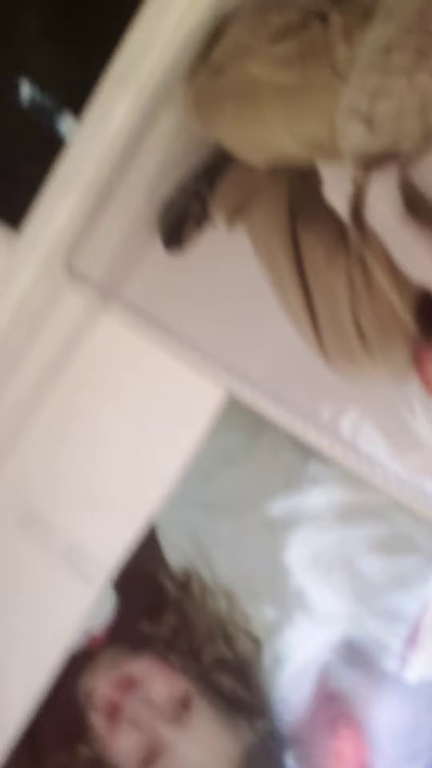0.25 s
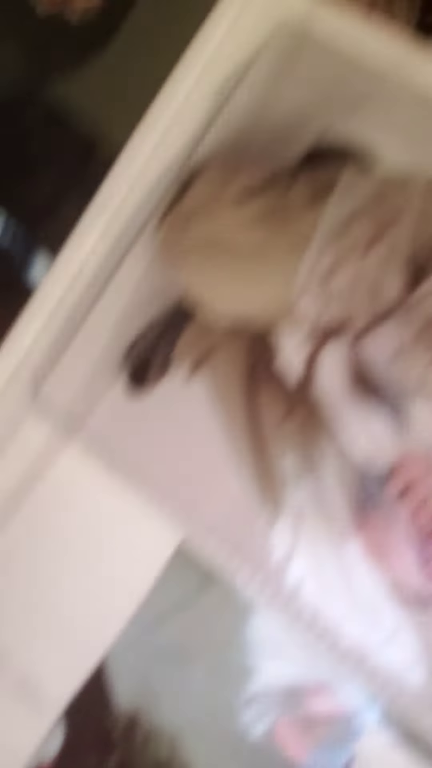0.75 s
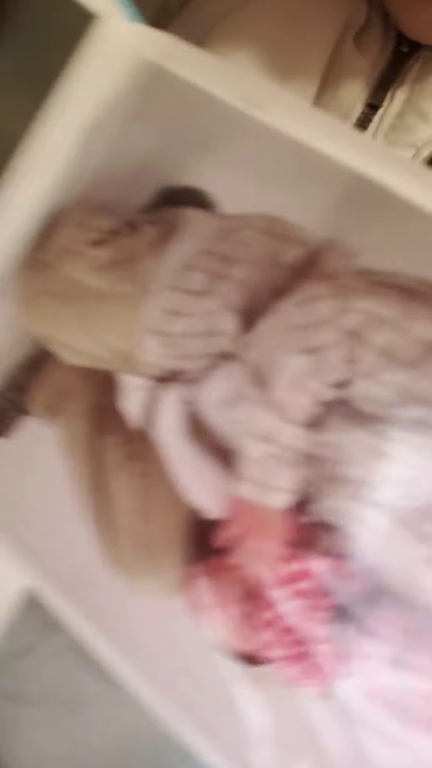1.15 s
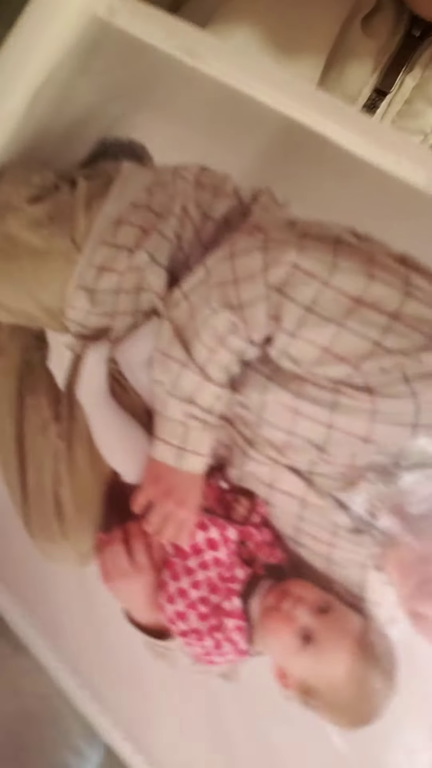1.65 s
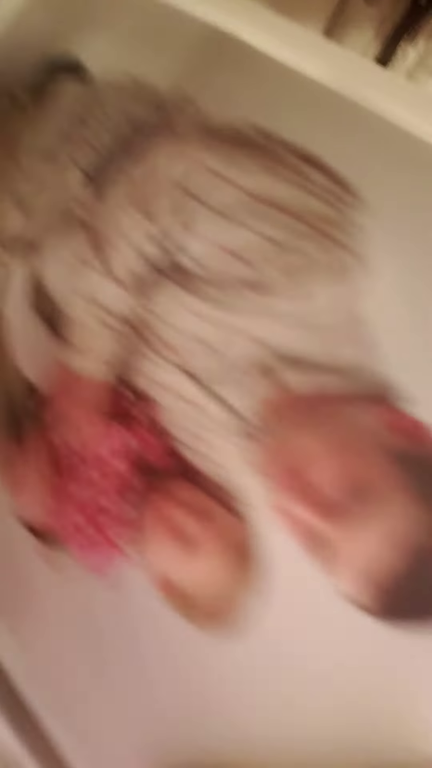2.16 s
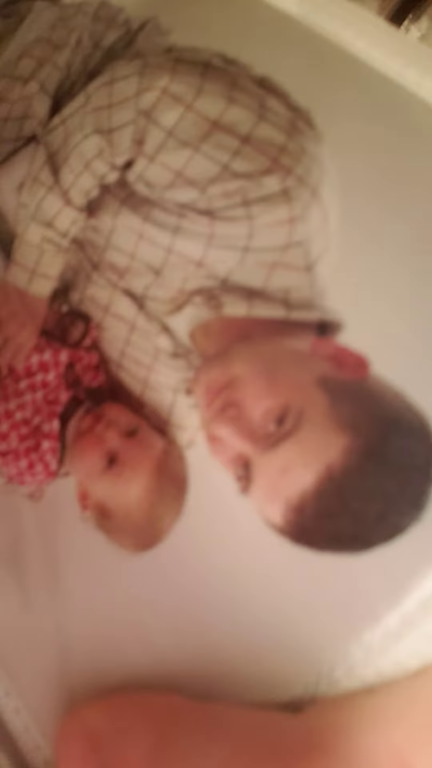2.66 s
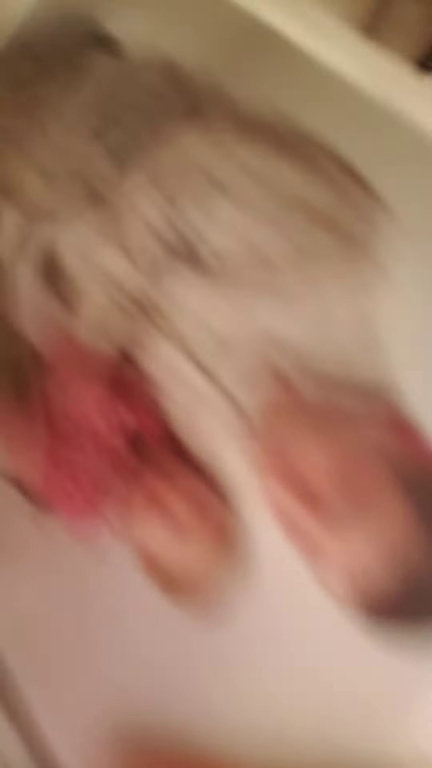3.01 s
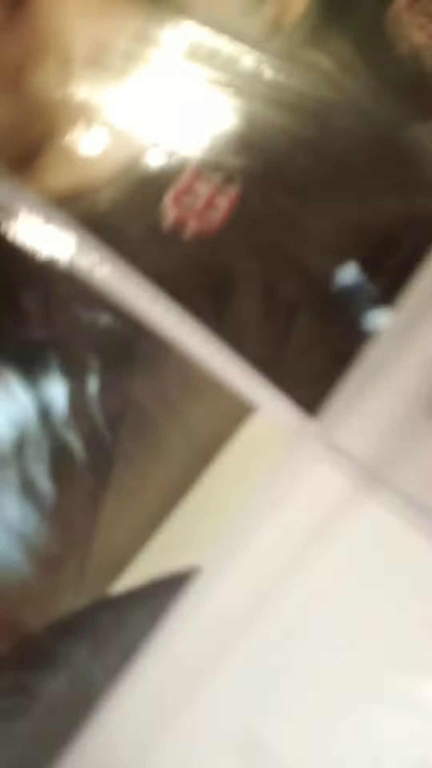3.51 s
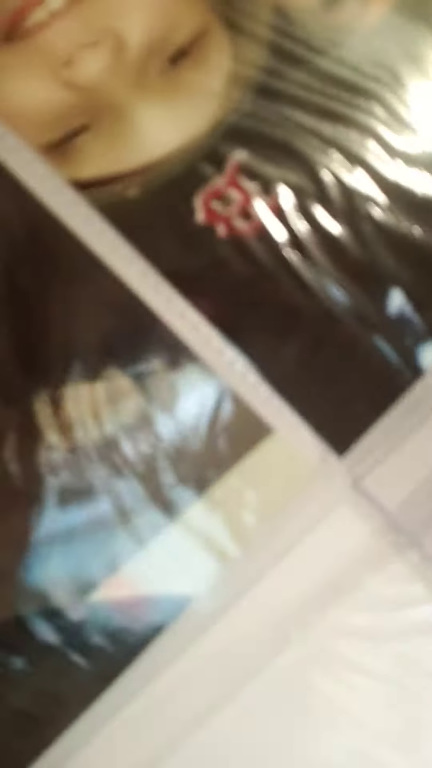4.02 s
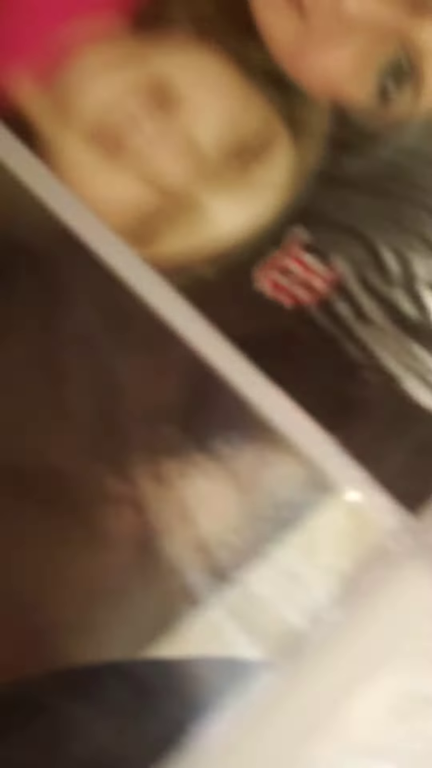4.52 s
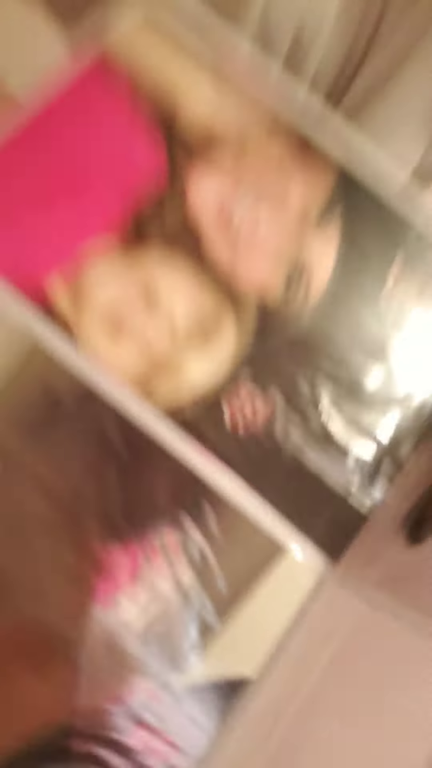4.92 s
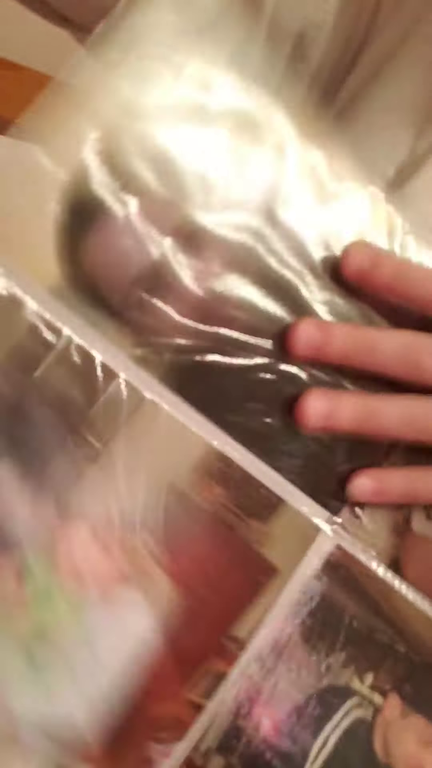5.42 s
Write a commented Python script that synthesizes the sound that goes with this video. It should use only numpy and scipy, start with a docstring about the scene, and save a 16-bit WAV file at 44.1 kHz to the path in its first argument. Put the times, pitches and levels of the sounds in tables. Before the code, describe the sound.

A photo album is handled in a quiet room. Soft film-on-film sliding and dull bumps come first, thinning to almost nothing but a few isolated ticks. Then the plastic page sweeps over, crinkling brightly, with bursts of sharp snaps, short scuffs and soft heavy bumps to the end. Close stereo pickup, stronger on the left, with faint air noise and little reverberation.

```python
"""Turning the pages of a photo album

Plastic sleeves are handled close to the left microphone, in a quiet room with faint air noise and hum.
Film slides over film: hiss and tiny stick-slips shake its resonances. Creases snap through as clicks that
ring briefly, and sleeves scuff past each other in short, gliding bands of noise. Heavy pages bump softly
and the stiff cover is knocked: both are pushes and rubs, the bumps mostly low and broad, the cover
ringing in narrower modes."""
import sys
import numpy as np
from scipy import signal
from scipy.fft import rfft, irfft, next_fast_len
from scipy.io import wavfile

SR = 44100
rng = np.random.default_rng(int(sys.argv[2]) if len(sys.argv) > 2 else 0)


def materialize(psi):
    """Save the field psi as 16-bit PCM at rate SR to the path in sys.argv[1].

    A 1-D psi becomes a single channel; in a 2-D psi each row is a channel.
    """
    bounded = np.clip(np.atleast_2d(psi).T, -1, 1)
    quanta = np.round(bounded * 32767).astype(np.int16)
    wavfile.write(sys.argv[1], SR, quanta)


N = 250078   # length in samples
TIME = np.arange(N) / SR   # s
PADDED = next_fast_len(N, real=True)   # a length that suits the Fourier transform
HZ = np.maximum(np.arange(PADDED // 2 + 1) * SR / PADDED, 1)
CUTOFF_HZ = 15800   # top of the sound
USUAL_PAN_DB = 15.5   # usual lean of a crease to the left


def from_db(db):
    """Decibels to gain."""
    return 10 ** (np.asarray(db) / 20)


def rms_one(x):
    """Scale to rms 1."""
    return x / np.sqrt(np.mean(x ** 2) + 1e-20)


def unit_energy(x):
    """Scale each channel to the energy of rms 1 held for a millisecond."""
    energy = np.sum(x ** 2, axis=-1, keepdims=True)
    return x / np.sqrt(energy / (SR / 1000) + 1e-20)


def leaning(pan_db):
    """Left and right gains that share one unit of power; positive leans to the left."""
    return 1 / np.sqrt(1 + from_db([[-pan_db], [pan_db]]) ** 2)


def at_hz(points, hz, axis=1):
    """Read one column of a table along log frequency."""
    table = np.array(points)
    return np.interp(np.log(hz), np.log(table[:, 0]), table[:, axis])


def drift(rate):
    """A random wander: straight lines between normal random values, `rate` of them per second."""
    knots = rng.standard_normal(4096)
    return np.interp(TIME * rate, np.arange(len(knots)), knots)


def resonate(x, hz, octaves):
    """A resonance as a band filter, reaching `octaves` to either side of its centre."""
    edges = np.clip([hz / 2 ** octaves, hz * 2 ** octaves], [15, 30], [.4 * SR, .47 * SR])
    return signal.sosfilt(signal.butter(2, edges, "band", fs=SR, output="sos"), x)


def add(track, s, sound):
    """Mix a sound in at a time."""
    start = int(np.clip(round(s * SR), 0, N - 1))
    track[..., start:start + sound.shape[-1]] += sound[..., :N - start]


def pair(spectra, lag_s):
    """Two unrelated spectra become left and right: partly alike, most so at low pitch, the shared part late."""
    # how much the two sides share: f/Hz, likeness/0-1
    likeness = [(60, .55), (130, .7), (300, .85), (600, .65), (1100, .33), (3000, .22), (15000, .2)]
    alike = np.clip(at_hz(likeness, HZ), 0, 1)
    late = spectra[0] * np.exp(-2j * np.pi * HZ * lag_s)
    return np.array([spectra[0], alike * late + np.sqrt(1 - alike ** 2) * spectra[1]])


def ports(x, lag_s):
    """Each microphone port colours the sound; the right one lies in shadow and hears the shared part late."""
    # colour of the port facing the album and of the shadowed one: f/Hz, left level/dB, right level/dB
    port_colours = [(100, 0, -7), (350, 0, -4.5), (900, 0, -10), (2000, 0, -14.5), (4000, 0, -14),
                    (5200, -.5, -12.5), (6500, -1, -14.5), (7300, 3.5, -16), (7800, -1, -15.5),
                    (8350, -9, -22), (9500, -7, -23), (11200, -13, -12.5), (12300, -10, -7),
                    (13500, -10, -9), (15000, -10, -8)]
    gains = from_db([at_hz(port_colours, HZ, axis=1), at_hz(port_colours, HZ, axis=2)])
    return irfft(pair(rfft(x, PADDED), lag_s) * gains, PADDED)[:, :N]


def room_tone():
    """Still air is shaped noise; the low hum is a sine that wavers in phase and level."""
    # colour of the still air: f/Hz, level per Hz/dB
    air_colour = [(15, -52), (30, 2.5), (50, 1), (90, 2), (130, 0.5), (170, -12), (300, -17), (600, -32),
                  (1500, -47), (5000, -21), (15000, -26.5)]
    air_db, hum_hz, hum_db = -65, 102, -76   # levels ahead of the ports
    noise = rfft(rng.standard_normal((2, PADDED)))
    air = irfft(noise * from_db(at_hz(air_colour, HZ)), PADDED)[:, :N]
    hum = np.sqrt(2) * np.sin(2 * np.pi * hum_hz * TIME + .5 * drift(4.0))
    hum = hum * from_db(hum_db + 2 * drift(7.1))
    return ports(from_db(air_db) * rms_one(air) + hum * [[1], [0]], lag_s=0.00012)


def reflections(x, t60, wet_db):
    """The furnished room answers the left channel with a short, dull tail of fading noise."""
    t = TIME[:16384]
    tail = rng.standard_normal((2, len(t))) * from_db(-60 * t / t60) * (t > .004)
    tail = signal.sosfilt(signal.butter(1, 5000, fs=SR, output="sos"), tail)
    tail = rms_one(tail) / np.sqrt(len(t))
    return from_db(wet_db) * signal.fftconvolve(x[:1], tail, axes=1)[:, :N]


def thud(hz, octaves, t60, rise_s, push):
    """A soft contact, part one push and part a rub that swells and dies away, sounds one resonance."""
    t, push = TIME[:16384], np.clip(push, 0, 1)   # push: share of the power, 0-1
    swell = (1 - np.exp(-t / rise_s)) * from_db(-60 * t / t60)
    force = np.sqrt(1 - push) * rng.standard_normal((2, len(t))) * swell / np.linalg.norm(swell)
    add(force[0], rise_s / 2, np.sqrt([push]))
    return rms_one(resonate(force, hz, octaves)) * np.sqrt(np.mean(swell ** 2))


def bumping_pages():
    """The limp, heavy pages bump against hand and album: each thud sounds one resonance, most low and broad."""
    # bumps: t/s, level ahead of the ports/dB, centre f/Hz, spread to either side/octaves,
    # time for the rub to fade by 60 dB/s
    bumps = [(0.331, -42.5, 238, 0.93, 0.17), (0.443, -43, 450, 1, 0.17), (1.131, -47.5, 203, 2.26, 0.47),
             (1.137, -44, 140, 1.2, 0.16), (1.19, -52.5, 920, 0.41, 0.28), (1.217, -53.5, 323, 0.46, 0.5),
             (1.409, -64, 328, 0.51, 1), (1.474, -46.5, 642, 0.76, 0.16), (1.499, -46, 200, 1, 0.21),
             (1.638, -48, 150, 1.73, 0.24), (1.77, -67, 60, 0.71, 0.66), (3.554, -48.5, 132.5, 0.4, 0.25),
             (3.82, -46, 153, 0.39, 0.22), (4.546, -37, 140, 0.89, 0.054), (4.808, -30.5, 104, 0.47, 0.048),
             (4.868, -28, 103.5, 1.13, 0.053), (4.888, -36, 74.6, 0.64, 0.068),
             (5.079, -36.5, 135.2, 0.5, 0.075), (5.114, -32.5, 79.4, 0.57, 0.071),
             (5.143, -35, 74.6, 0.49, 0.056), (5.183, -30, 82, 0.61, 0.097), (5.4, -35.5, 308, 0.11, 0.11),
             (5.402, -41, 750, 1, 0.21), (5.433, -37, 75, 1.5, 0.077)]
    push_s = 0.098   # bumps much shorter than this are one push, longer ones mostly rubbing
    out = np.zeros((2, N))
    for s, db, hz, spread, t60 in bumps:
        push = np.exp(-(t60 / push_s) ** 2)
        add(out, s, from_db(db) * thud(hz, spread, t60, rise_s=0.0107, push=push))
    return out


def knocking_cover():
    """The stiff cover is knocked and rings with several modes at once."""
    # knocks: t/s, level to which each mode's own level is added/dB
    knocks = [(.439, -36.5), (.453, -47.5), (5.408, -48)]
    # modes of the cover: f/Hz, width to either side/octaves, level/dB, time to fade by 60 dB/s
    modes = [(424, 0.22, -9.5, 0.27), (640, 0.086, -4, 0.17), (1200, 0.29, -3, 0.16),
             (2010, 0.053, 4.5, 0.15), (2886, 0.09, 17, 0.039), (3900, 0.36, 3, 0.11)]
    out = np.zeros((2, N))
    for s, db in knocks:
        for hz, width, mode_db, t60 in modes:
            add(out, s, from_db(db + mode_db) * thud(hz, width, t60, rise_s=0.00668, push=0.084))
    return out


def micro_slips(per_s, size_db):
    """Tiny stick-slip clicks in clumps, of very uneven size; rms 1."""
    born = rng.random(N) < per_s * from_db(5 * drift(70)) / SR
    sizes = from_db(size_db * np.minimum(rng.exponential(1, N), 3.5))
    clicks = born * sizes * rng.choice([-1, 1], (1, N))
    shiver = rng.standard_normal((2, 64)) * np.exp(-np.arange(64) / 14)
    # all pitches equally strong, but each click smeared over about a millisecond
    flat = irfft(np.exp(1j * np.angle(rfft(shiver))))
    return rms_one(signal.fftconvolve(clicks, flat, axes=1)[:, :N])


def grainy_noise(grain, per_s):
    """Smooth friction hiss mixed with micro-slips; `grain` is the slips' share of the power, 0-1."""
    hiss = rng.standard_normal((2, N))
    return np.sqrt(1 - grain) * hiss + np.sqrt(grain) * micro_slips(per_s, size_db=2.0)


def scuffing(grit=0.14, flutter_db=-1.3, taper=0.53, count=5):
    """A sleeve breaks loose and skids; its resonance glides as the free length of film changes."""
    # scuffs of film on film, the narrow ones almost singing: t/s, length/s, level before flutter and fades/dB,
    # centre f/Hz, spread to either side/octaves, glide/octaves
    scuffs = [(0.0, 0.64, -52.5, 3130, 0.11, -0.04), (0.0, 0.36, -59, 1990, 0.05, -0.017),
              (0.632, 0.12, -48, 3120, 0.26, -0.056), (0.668, 0.029, -44.5, 5770, 0.49, 0.076),
              (0.886, 0.019, -44, 3200, 0.18, -0.069), (0.934, 0.088, -46.5, 4600, 0.053, 0.16),
              (0.961, 0.07, -45, 3430, 0.1, 0.034), (0.999, 0.046, -46, 2320, 1.34, 0),
              (1.073, 0.043, -50, 1710, 0.21, -0.092), (1.022, .3, -57.5, 11800, 0.3, 0.04),
              (1.221, .25, -56.5, 3520, 0.12, -0.026), (1.492, 0.053, -59, 2540, 0.034, -0.019),
              (1.857, .3, -61, 7700, .17, 0.071), (2.874, 0.18, -66, 6650, 0.27, 0.4),
              (2.881, 0.17, -53.5, 3400, 0.59, -0.0052), (3.192, 0.26, -49.5, 756, 0.27, 0.25),
              (3.197, 0.11, -33, 4360, 0.69, 0.29), (3.281, 0.114, -36, 6040, 0.71, 0.22),
              (3.429, 0.33, -43, 3900, 0.26, 0.084), (4.145, 0.19, -49.5, 4170, 0.16, -0.034),
              (4.221, 0.024, -43.5, 1740, 0.18, 0.1), (3.786, 0.018, -26, 5160, 0.88, 0.000094),
              (3.777, 0.072, -35, 13260, 0.28, 0), (3.813, 0.064, -34, 4150, 0.57, -0.24),
              (4.311, 0.063, -39, 2570, 0.16, -0.079), (4.507, 0.023, -33.5, 2860, 0.41, -0.34),
              (4.496, 0.02, -32.5, 4570, 1.07, 0), (4.545, 0.0082, -27.5, 4470, 1.1, 0),
              (4.608, 0.027, -34, 5500, 0.81, 0), (4.971, 0.04, -32.5, 7900, 0.35, 0),
              (5.01, 0.09, -45, 3450, 0.089, -0.51), (5.213, 0.076, -35.5, 3050, 0.31, 0.13),
              (5.272, 0.032, -34, 6860, 0.62, -0.09), (5.378, 0.042, -33.5, 1685, 0.36, -0.027),
              (5.385, 0.034, -26.5, 4760, 0.33, -0.1), (5.437, 0.034, -28.5, 8050, 0.24, 0),
              (5.439, 0.022, -32.5, 2800, 0.63, 0), (5.476, 0.027, -28.5, 8120, 0.28, -0.026),
              (5.519, 0.036, -38, 7950, 0.3, -0.13), (5.596, 0.092, -34, 6050, 0.14, -0.076),
              (5.6, 0.083, -30.5, 10140, 0.14, -0.04)]
    out, longest = np.zeros((2, N)), 20000   # samples
    drive = grainy_noise(grit, per_s=1200)
    starts = rng.integers(0, N - longest, len(scuffs))   # each scuff takes its own piece of noise
    stages = np.linspace(-.5, .5, count)
    for (s, length, db, hz, spread, glide), start in zip(scuffs, starts):
        size = int(np.clip(length * SR, 64, longest))
        piece = drive[:, start:start + size]
        progress = np.linspace(-.5, .5, size)
        skid = np.zeros((2, size))
        for at in stages:   # the glide cross-fades between fixed resonances
            share = np.interp(progress, stages, stages == at)
            skid += resonate(piece, hz * 2 ** (glide * at), spread) * share
        add(out, s, rms_one(skid) * signal.windows.tukey(size, taper) * from_db(db))
    return out * from_db(flutter_db * drift(110))


def rubbing():
    """Sleeve rubs over sleeve: each rub swells, holds and fades; the loudest sets colour and place."""
    # rubs, first smoothing the page, from 3 s lifting and sweeping it over, from 4.077 s buckling and settling:
    # full speed at t/s, swell/s, hold/s, fade/s (20 dB per swell or fade time), level before judder/dB,
    # treble setting/dB, page body setting/dB, crinkle share/0-1, extra level at the right port/dB
    rubs = [(0.0, 0.1, 0.024, 0.25, -45.5, 3, -12.5, 0.45, -2),
            (0.202, 0.35, 0.093, 0.4, -45, 5.5, -9.5, 0.34, -1.5),
            (0.38, 0.25, 0.07, 0.18, -43, -3, -12, 0.1, 4.5),
            (0.682, 0.21, 0.072, 0.32, -45, -4, -13.5, 0.5, -1),
            (0.885, 0.17, 0.012, 0.0086, -46, 6, -24, 0.7, -5),
            (0.975, 0.16, 0.062, 0.037, -41, -2, -16.5, 0.27, 0.5),
            (1.058, 0.17, 0.14, 0.38, -48.5, 3.5, -8.5, 0.2, 6),
            (1.507, 0.1, 0.034, 0.065, -49, -4.5, -10, 0.28, 6.5),
            (1.633, 0.08, 0.017, 0.13, -47, -3, -6, 0, 6),
            (1.894, 0.42, 0.36, 0.22, -54, -0.5, -10.5, 0.07, -5.5),
            (2.795, 0.24, 0.037, 0.44, -67.5, -15, -6, 0, 3),
            (3, 0.099, 0.27, 0.081, -46, 6.5, -15.5, 0, -2),
            (3.211, 0.24, 0.15, 0.3, -36.5, 8, -10.5, 0.55, 1.5),
            (3.418, 0.5, 0.25, 0.81, -42, 0.5, -1.5, 0.6, -1.5),
            (3.793, 0.046, 0.042, 0.15, -38.5, 6.5, -4.5, 0.4, -2),
            (3.853, 0.06, 0.011, 0.51, -39.5, -0.5, -6.5, 0.5, 1.5),
            (4.077, 0.081, 0.14, 0.41, -40, -1, -9, 0.27, 1.5),
            (4.326, 0.064, 0.054, 0.045, -40.5, -2, -7.5, 0.73, 4.5),
            (4.432, 0.083, 0.054, 0.044, -40.5, -10.5, -6.5, 0.96, 5.5),
            (4.513, 0.086, 0.062, 0.33, -32.5, -1.5, -11.5, 0.5, 2),
            (4.682, 0.036, 0.28, 0.42, -39.5, 2, -7.5, 0.74, -2),
            (5.022, 0.09, 0.19, 0.33, -39.5, -0.5, -7.5, 0.7, -4),
            (5.176, 0.062, 0.1, 0.41, -38.5, 2.5, -10.5, 0.57, 1),
            (5.397, 0.15, 0.018, 0.078, -31, 1.5, -15.5, 0.67, 3.5),
            (5.486, 0.091, 0.011, 0.095, -35.5, 3, -14, 0.78, -3),
            (5.584, 0.15, 0.079, .1, -43, 12, -10.5, 0.52, -1)]
    rest_db = -76   # the sleeves never lie quite still
    power, colour = from_db(rest_db) ** 2, 0
    for s, swell, hold, fade, db, *tone in rubs:
        away = np.maximum((s - TIME) / swell, 0) + np.maximum((TIME - s - hold) / fade, 0)
        rub = from_db(db - 20 * np.minimum(away, 10)) ** 2
        power, colour = power + rub, colour + np.outer(tone, rub)
    treble, body, crinkle, right_db = colour / power
    return 10 * np.log10(power), treble, body, np.clip(crinkle, 0, 1), right_db


def sliding(level, treble, body, crinkle, flex_db=2.5, flex_rate=9, judder_db=1.5, count=30):
    """Friction hiss and micro-slips shake the film, whose resonances shift as it flexes."""
    # colour of rubbed film: f/Hz, level per Hz/dB
    film_colour = [(25, -22), (70, -7.5), (200, -10.5), (400, -10), (850, -4.5), (1400, -3.5), (2000, 3.5),
                   (3000, 3.5), (4500, 2), (6300, -2), (9000, 1.5), (12000, -7), (15500, -6.5)]
    sparkle_db, usual_crinkle = 15, 0.72   # dB per unit of crinkle beyond the usual share
    drive = grainy_noise(crinkle, per_s=550)
    drive = rfft(drive, PADDED) * rms_one(from_db(at_hz(film_colour, HZ)) * (HZ < CUTOFF_HZ))
    centres, out = np.geomspace(200, 15000, count), np.zeros((2, N))
    for k, hz in enumerate(centres):   # overlapping bands, each with its own wander
        share = np.interp(np.log(HZ), np.log(centres), np.arange(count) == k)
        band = irfft(drive * share, PADDED)[:, :N]
        high = np.clip(np.log2(hz / 3600), 0, 1)
        low = np.clip(np.log2(1900 / hz), 0, 1)
        sparkle = sparkle_db * (crinkle - usual_crinkle) * (hz > 10000)
        tilt = high * (treble - 0.5) + low * (body + 13.5)
        out += band * from_db(sparkle + tilt + flex_db * drift(flex_rate))
    return out * from_db(level + judder_db * drift(60))


def swaying_echo(x, delay_s=0.001625, sway=0.248, sway_rate=5.0, echo_db=-15.0):
    """A faint, randomly swaying short echo gives the rustle a shifting, hollow colour."""
    late = TIME - delay_s * np.exp(sway * drift(sway_rate))
    echo = np.array([np.interp(late, TIME, side) for side in x])
    return (x + from_db(echo_db) * echo) / np.sqrt(1 + from_db(echo_db) ** 2)


def small_creases(level, crinkle, count=900):
    """Small creases give way at random, more often as the film crinkles, stronger as it rubs harder."""
    per_s = 150   # rate at full crinkle
    size_db, scatter_db, limit_db = -9.5, 4, -32.5   # size against the rub; the limit scatters by 1 dB
    centre_hz, tick_db = 4500, -21.5   # usual pitch and treble tick, both scattered
    place, chance = rng.random((count, 2)).T
    size, pitch, tick = rng.standard_normal((count, 3)).T
    at = (place * N).astype(int)
    db = np.minimum(level[at] + size_db + scatter_db * size, limit_db + size)
    hz = centre_hz * 2 ** (.5 * pitch)
    rows = np.transpose([at / SR, db, hz, np.full(count, USUAL_PAN_DB), tick_db + 4 * tick])
    return rows[chance < per_s * crinkle[at] ** 2 * N / SR / count]


def snapping(creases):
    """A crease flips in a sharp click with a very short, soft onset, rebounds, chatters and rings at its pitch."""
    onset_db, onset_t60 = -19.0, 0.0042   # t60: s per 60 dB of rise or fade
    chatter_db, chatter_t60 = -15.5, 0.0086
    ring_db, ring_t60 = -19, 0.03   # slow part of the chatter, against its fast part
    rebound_s, jolt_db, tone_db = 0.0005, -18, -9.5   # rebound comes after 0.5 to 1.5 times this
    port_hz, port_db, tick_hz, tick_pan_db = 7300, -5.5, 12700, -4
    octaves, narrowing_per_db = 0.75, 0.13   # the further a snap leans to the left, the narrower its band
    lead, delay_s = 64, .00035   # samples of onset ahead of the click; all sounds this much early
    out, t = np.zeros((2, N)), (np.arange(1024) - lead) / SR
    after = from_db(-60 * t / chatter_t60) + from_db(ring_db - 60 * t / ring_t60)
    fade = (t >= 0) * from_db(chatter_db) * after
    fade = fade + (t < 0) * from_db(onset_db - 60 * abs(t) / onset_t60)
    top = signal.butter(2, 8300, fs=SR, output="sos")   # dulls all but the tick
    for s, db, hz, pan, tick_db in creases:
        flip, back = rng.choice([-1, 1], 2)
        crack = rng.standard_normal((2, len(t))) * fade + flip * (t == 0)
        add(crack, lead / SR + rebound_s * (.5 + rng.random()), back * np.ones(1))
        breadth = np.exp(narrowing_per_db * (USUAL_PAN_DB - pan))
        left = resonate(crack[0], hz, octaves * breadth)
        jolt = resonate(crack[0], hz / 2.36, 2.0)   # the crack also jolts the page
        left = left + breadth ** 2 * from_db(jolt_db) * jolt
        film_ring = from_db(tone_db) * resonate(left, hz, 0.18)
        port_ring = from_db(port_db) * resonate(left, port_hz, 0.11)
        left = left + film_ring + port_ring
        # the right port hears a brighter, broader snap
        right = resonate(crack[1], hz * 2.3, 2.0 * octaves * breadth)
        body = unit_energy(signal.sosfilt(top, [left, right])) * leaning(pan)
        tick = unit_energy(resonate(crack, tick_hz, 0.22)) * leaning(tick_pan_db)
        add(out, s - lead / SR - delay_s, from_db(db) * (body + from_db(tick_db) * tick))
    return out


def scene():
    """The album close by, in its room."""
    # creases snapping through: t/s, level over 1 ms without the tick/dB, centre f/Hz, left over right/dB,
    # treble tick against the snap/dB
    snaps = [(0.035, -32.5, 5570, 13.5, -28), (0.0393, -33.5, 4300, 17, -18), (0.0498, -37, 5060, 8, -14),
             (0.0708, -45, 3600, 12, -25), (0.1303, -40, 4200, 11, -25), (0.136, -40, 4330.0, 12, -29),
             (0.6822, -37, 3500, 14.5, -25), (0.6872, -33.5, 4800, 13.5, -26), (0.7436, -32, 5400, 18, -32),
             (0.846, -41, 4100, 12, -14), (1.76, -46, 5120, 10, -17.5), (2.1786, -27.5, 4870, 16, -19),
             (2.3593, -46.5, 5000, 18, -24), (2.542, -41.5, 6060, 21, -43), (2.593, -32.5, 6000, 20, -37),
             (2.638, -46, 5530, 19.5, -20), (3.1766, -30, 6000, 16, -16), (3.2013, -26, 4270, 9, -20),
             (3.211, -25, 4800, 14, -22), (3.2173, -24.5, 5350, 22, -8), (3.2275, -22, 6000, 28, -16),
             (3.2472, -22.5, 4030.0, 10, -12), (3.251, -27, 4000, 15, -18), (3.2675, -29, 6660, 16, -17),
             (3.2812, -32, 4150.0, 14, -7), (3.3767, -17, 7100, 22.5, -26), (3.398, -30, 4150, 16, -28),
             (3.431, -33, 3800, 10.5, -18), (3.4372, -31.5, 3020, 13, -22), (3.445, -29.5, 3260, 15, -22),
             (3.691, -33.5, 4500, 12, -14), (3.721, -22, 3230, 9.5, -11), (3.7282, -26, 2800, 20, -16),
             (3.7901, -29, 4810.0, 21, -23), (3.7979, -22, 5700, 24, -16), (3.8062, -24, 5470, 16, -15),
             (3.8102, -15.5, 5640, 16.5, -9), (3.816, -20.5, 5430.0, 17, -10.5),
             (3.8874, -21.5, 5270, 18, -17), (3.928, -31.5, 3040, 15, -24), (3.9392, -32, 2710, 18, -22),
             (4.0864, -42, 4100, 17, -5), (4.148, -29, 2580, 16, -33), (4.1824, -18.5, 5300, 17.5, -26),
             (4.312, -29.5, 3000, 15.5, -46), (4.3182, -33, 4200, 11, -24), (4.326, -28, 3040, 16.5, -28),
             (4.346, -24, 4500, 18, -20), (4.3477, -22.5, 4300.0, 20, -12), (4.352, -24.5, 4000, 15, -9),
             (4.3616, -26, 3900, 10, -16), (4.3693, -23.5, 3010.0, 14.5, -24),
             (4.3748, -18.5, 4270, 13, -21), (4.3779, -25, 2870, 17, -24), (4.3907, -19.5, 6640, 11.5, -10),
             (4.422, -26.5, 4360, 14, -19), (4.4278, -19.5, 3970, 15, -28), (4.433, -30.0, 4230.0, 15, -13),
             (4.462, -19, 4500, 17, -16.5), (4.4765, -35, 4600, 11, -9), (4.4883, -36, 3260, 23, -34),
             (4.499, -22, 4900, 14, -25), (4.5112, -17.5, 3130, 15, -17), (4.5159, -18.5, 3800, 15.5, -11),
             (4.52, -21, 3430, 13, -19), (4.5477, -25.5, 4970, 16, -21), (4.5513, -26, 5840, 16, -27),
             (4.574, -32, 2620, 22, -24), (4.6036, -18.5, 6440, 14.5, -16), (4.6176, -28, 5230, 13.5, -29),
             (4.6352, -24, 4650.0, 14, -25), (4.6486, -28, 4120, 13, -8), (4.6742, -25, 2780, 13.5, -16),
             (4.712, -26, 4600, 10, -8), (4.73, -20.5, 6460, 21.5, -25), (4.738, -26, 5000.0, 10.5, -5),
             (4.755, -31, 4420.0, 17, -6), (4.801, -43, 4330, 5, -17), (4.8083, -34, 5350, 14, -15),
             (4.815, -31, 5160.0, 10.5, -15), (4.8211, -27.5, 3390.0, 8.5, -19),
             (4.8478, -30.5, 6500, 15.5, -12), (4.8534, -32.5, 5360, 15, -17),
             (4.864, -30.5, 5730.0, 11, -16), (4.9064, -27, 6100, 17, -12), (4.9138, -22, 6800, 17.5, -22),
             (4.9362, -22, 2930, 20, -22), (4.9891, -26, 7150, 20, -25), (5.0124, -25, 5800, 18, -15),
             (5.048, -27.5, 4570, 8.5, -15), (5.097, -28.5, 3030, 27, -33), (5.118, -31, 2800, 15, -25),
             (5.165, -34, 2930, 15, -22), (5.181, -30, 4990.0, 19, -8), (5.1887, -19.5, 3850, 15, -13),
             (5.1918, -21, 5200, 13.5, -6), (5.329, -28.5, 3300, 17, -17), (5.3453, -23, 3950, 13, -15),
             (5.362, -24, 4440, 18, -23), (5.395, -14.5, 4580, 17, -31), (5.3964, -29, 4660, 13.5, -29),
             (5.401, -23, 5300, 21, -27), (5.4113, -23, 3230.0, 4, -22), (5.4124, -23, 3540.0, 10, -24),
             (5.4965, -32, 6540.0, 14, -19), (5.5034, -28, 3100, 26, -32), (5.579, -28, 5530, 17, -22)]
    level, treble, body, crinkle, right_db = rubbing()
    room = room_tone()
    bumps = ports(bumping_pages() + knocking_cover(), lag_s=0.0001)
    rustle = swaying_echo(sliding(level, treble, body, crinkle))
    film = ports(rustle + scuffing(), lag_s=0.00036)
    album = (film + bumps) * from_db(right_db * [[0], [1]])
    album = album + snapping([*snaps, *small_creases(level, crinkle)])
    return album + reflections(album, t60=0.4, wet_db=-24.5) + room


def record(dry):
    """The microphones add a faint hiss; the top is cut steeply."""
    hiss = from_db(-75.0) * rng.standard_normal((2, N))
    return signal.sosfilt(signal.ellip(10, .1, 80, CUTOFF_HZ, fs=SR, output="sos"), dry + hiss)


dry = scene()
out = record(dry)
materialize(out)
```